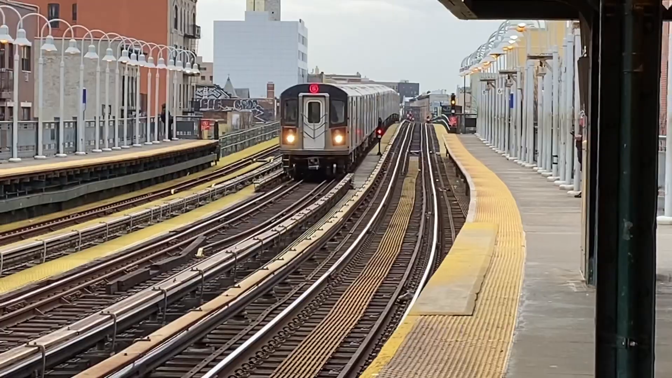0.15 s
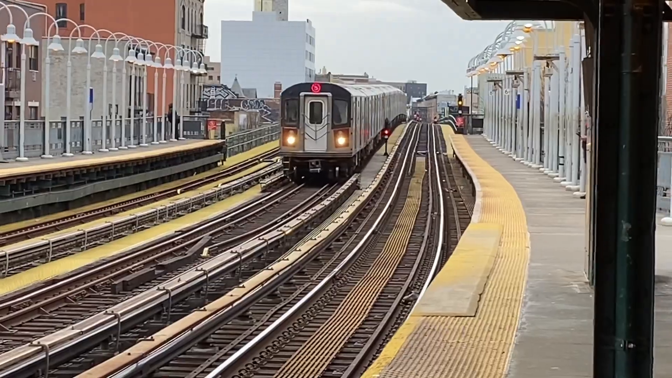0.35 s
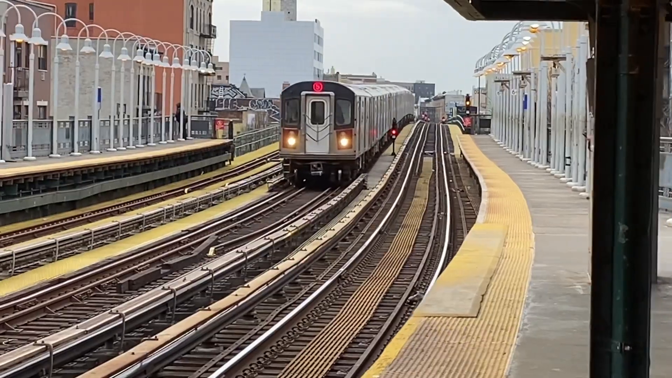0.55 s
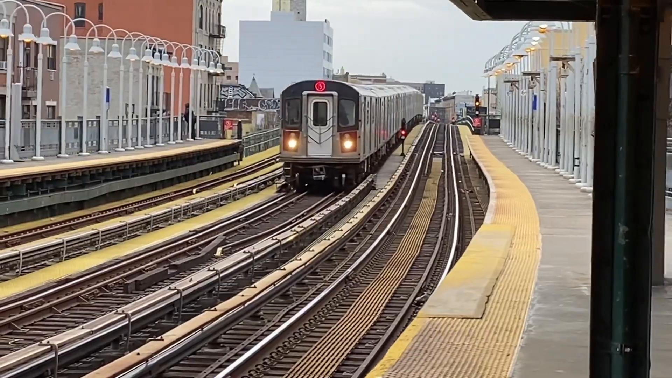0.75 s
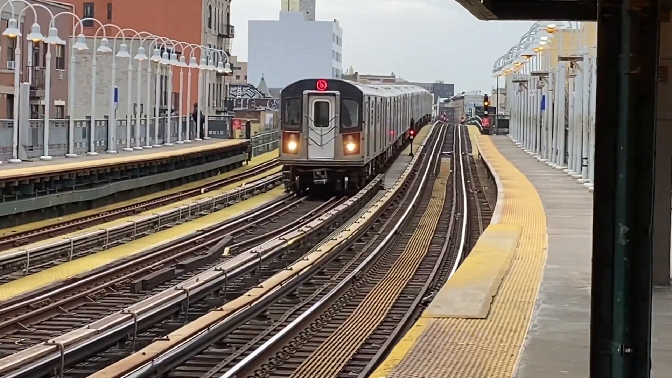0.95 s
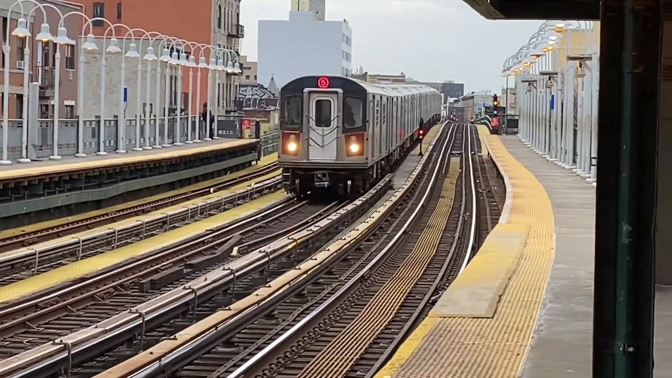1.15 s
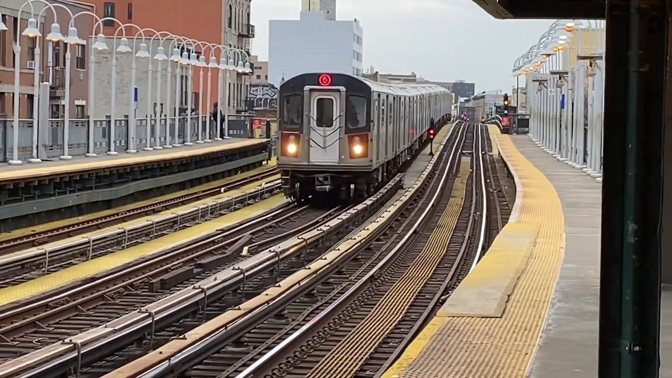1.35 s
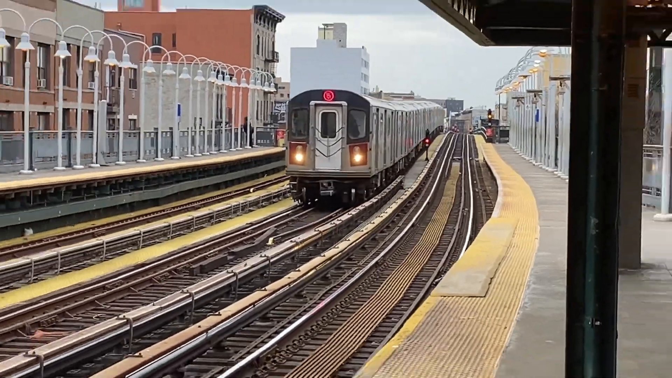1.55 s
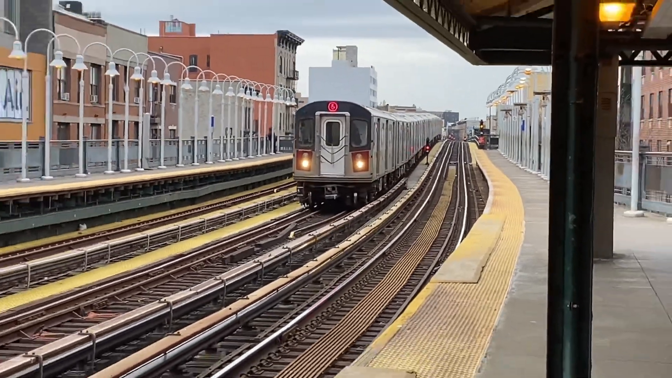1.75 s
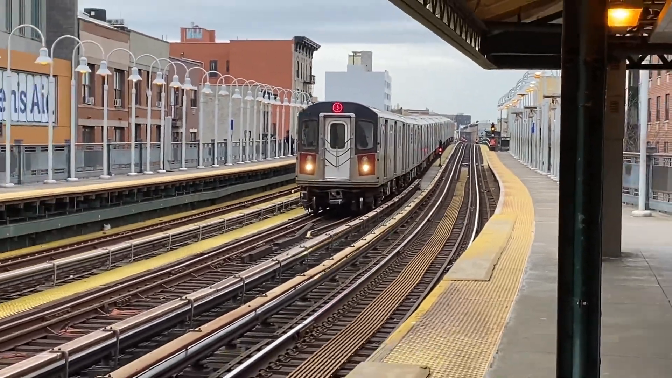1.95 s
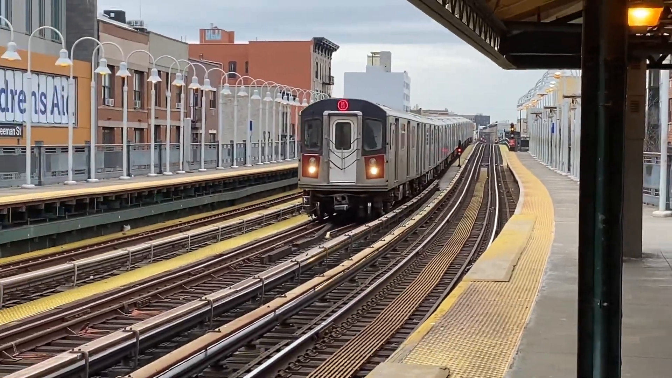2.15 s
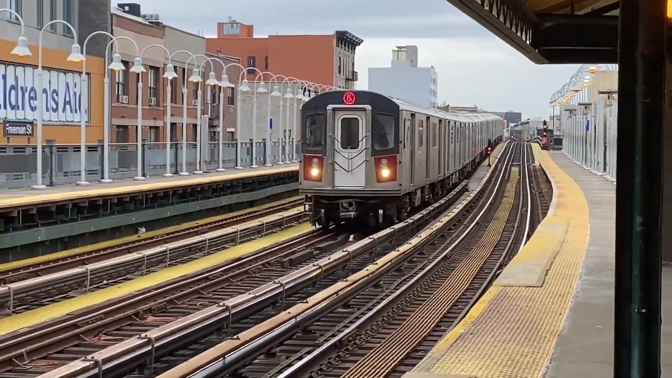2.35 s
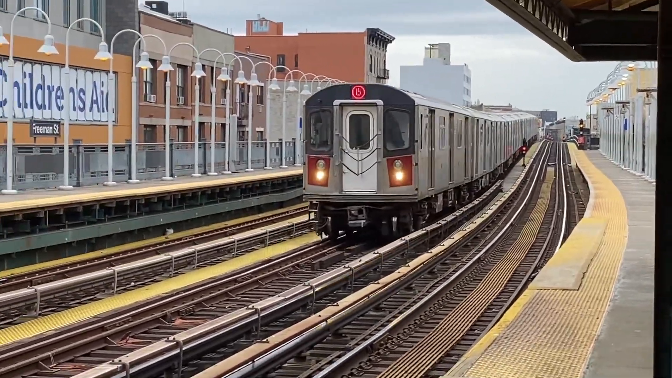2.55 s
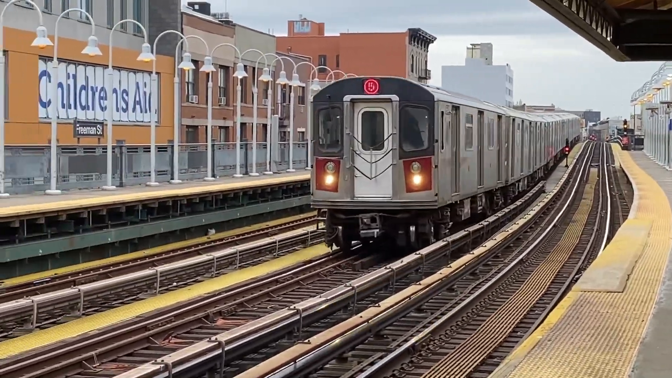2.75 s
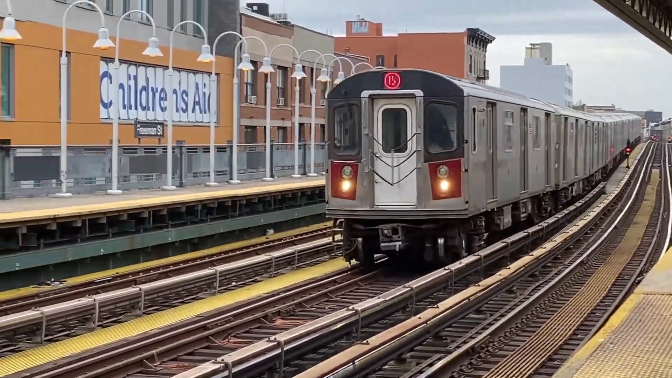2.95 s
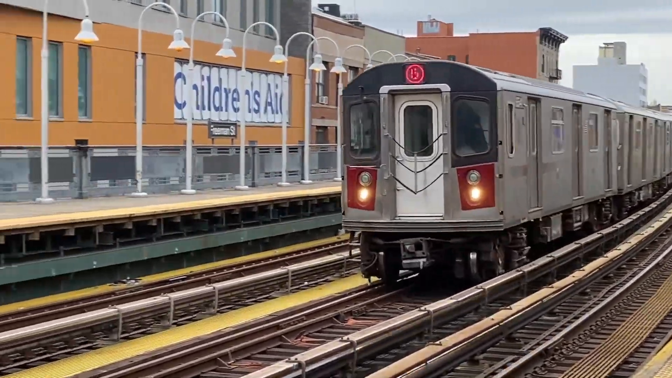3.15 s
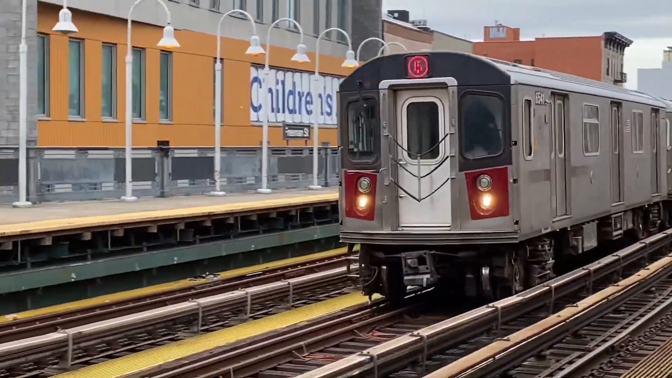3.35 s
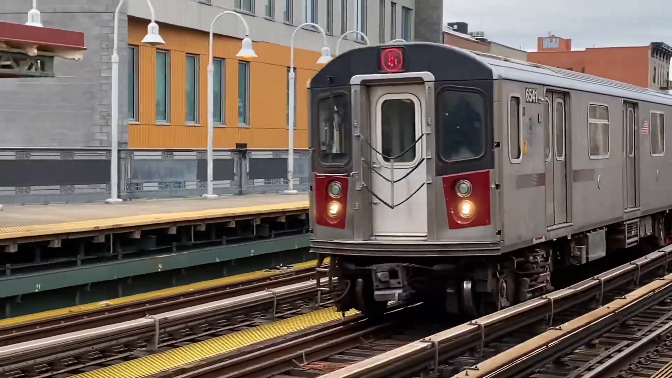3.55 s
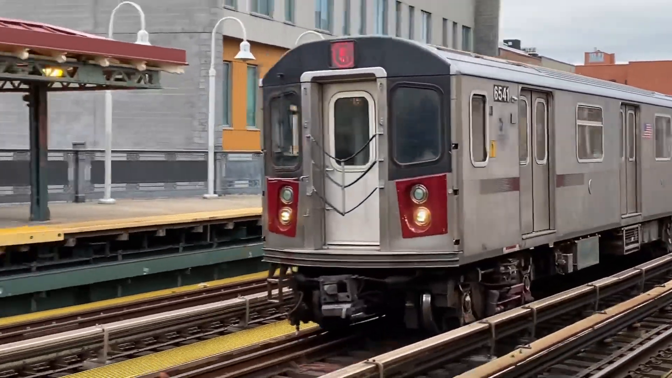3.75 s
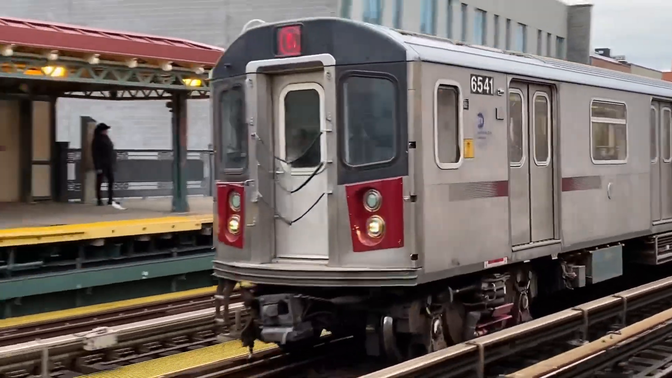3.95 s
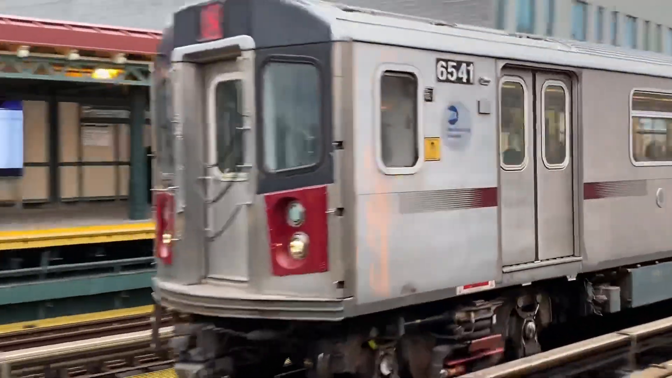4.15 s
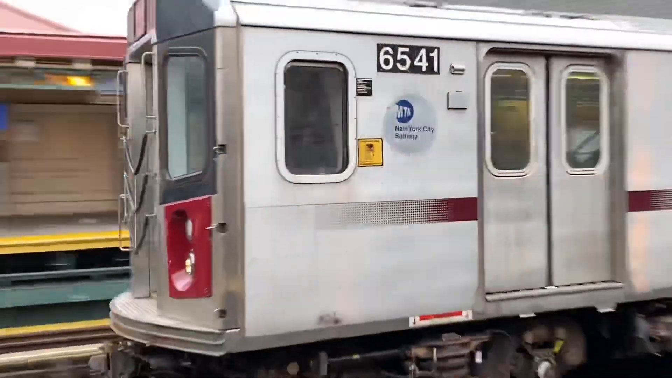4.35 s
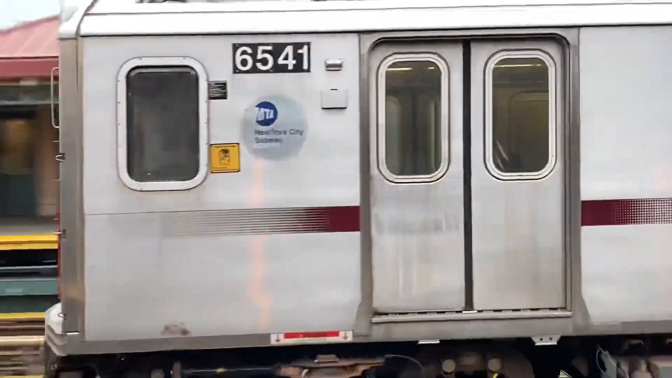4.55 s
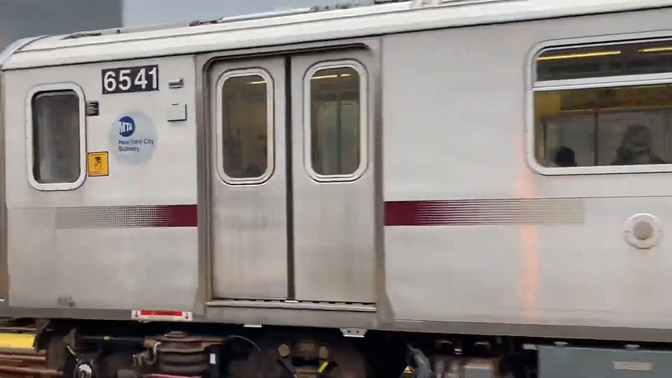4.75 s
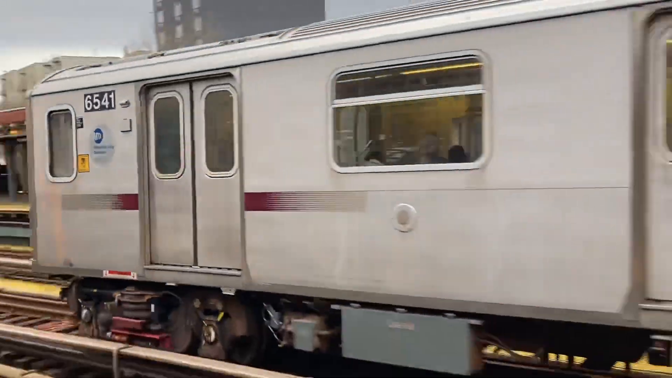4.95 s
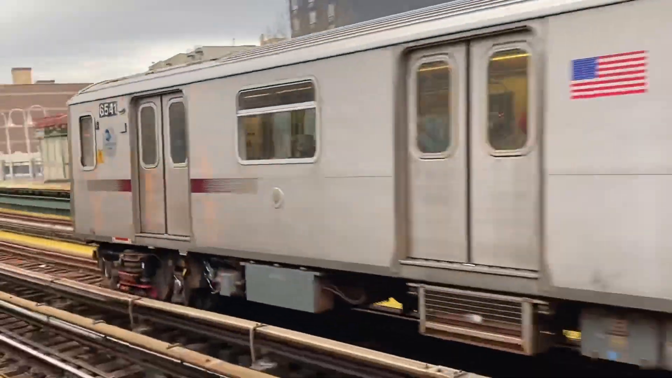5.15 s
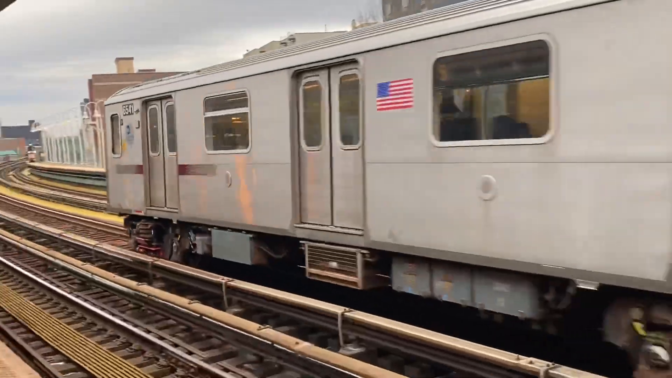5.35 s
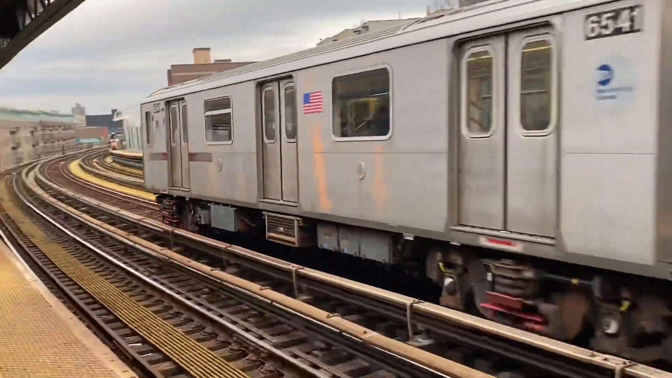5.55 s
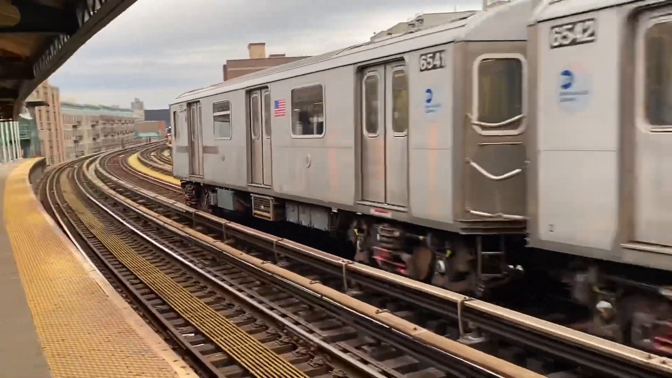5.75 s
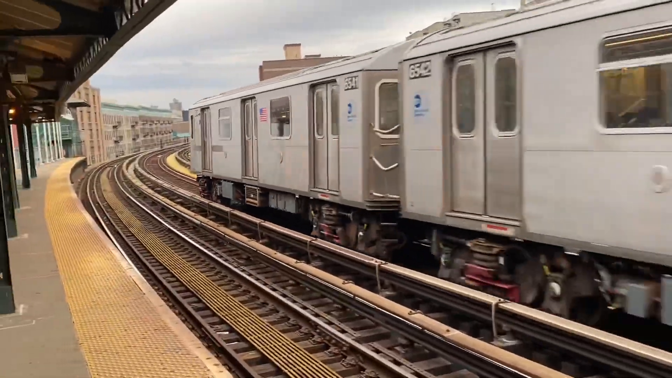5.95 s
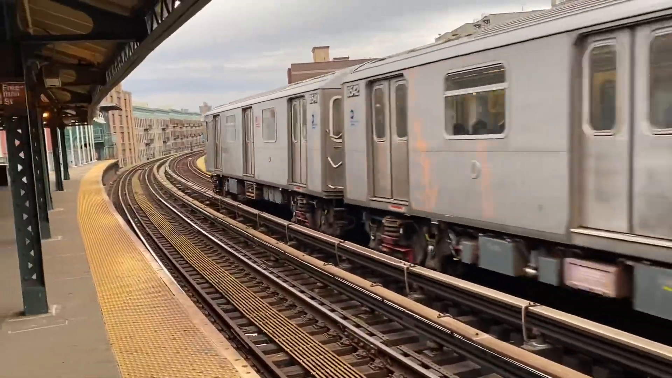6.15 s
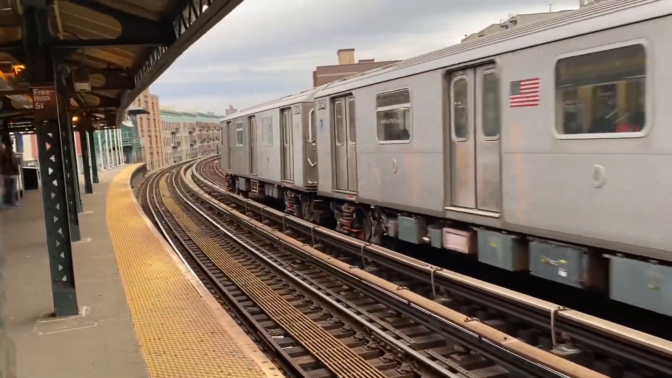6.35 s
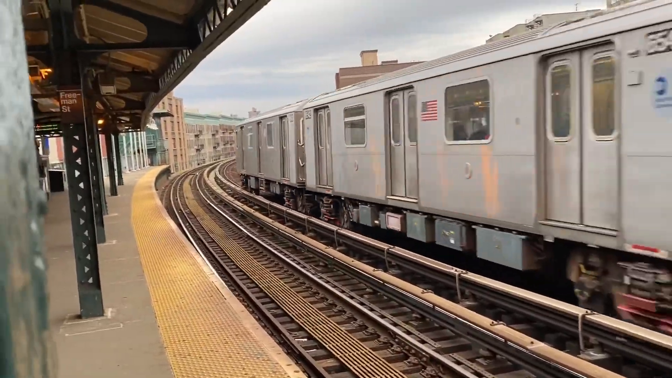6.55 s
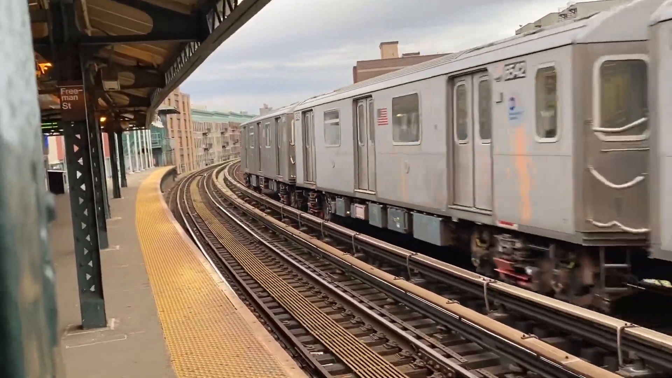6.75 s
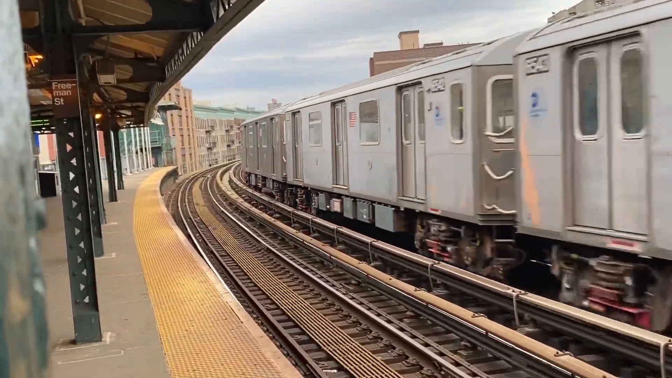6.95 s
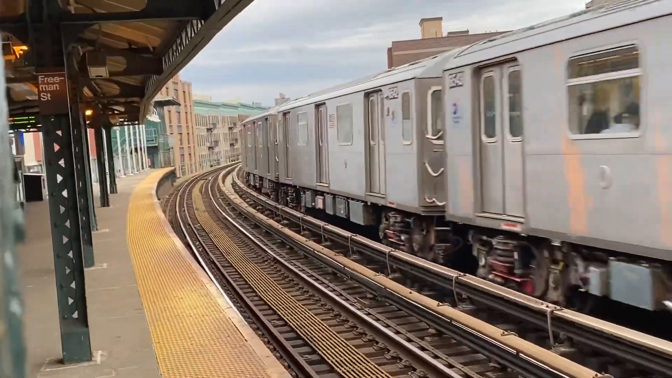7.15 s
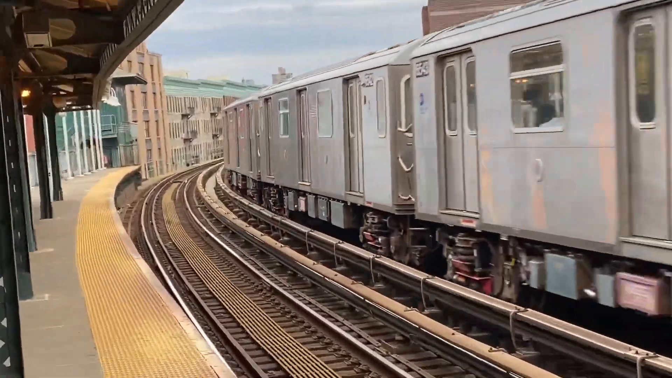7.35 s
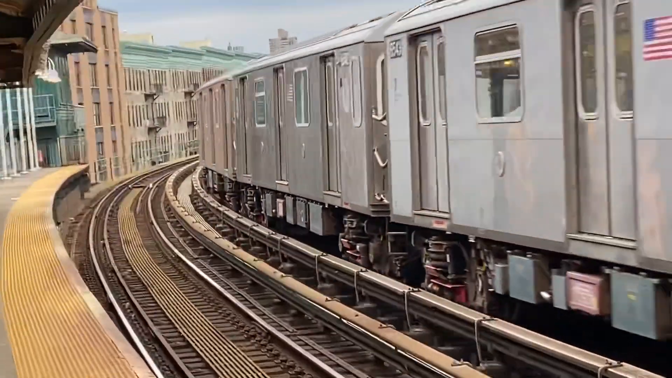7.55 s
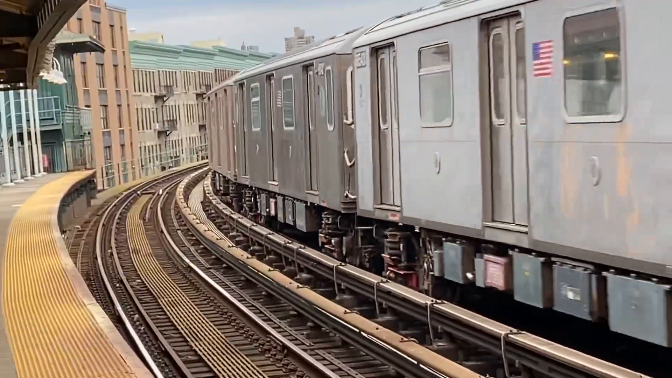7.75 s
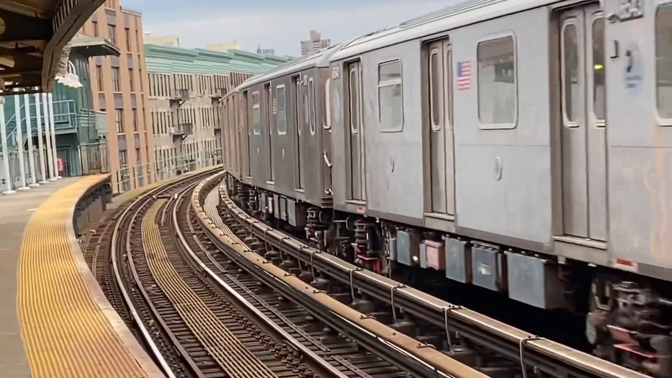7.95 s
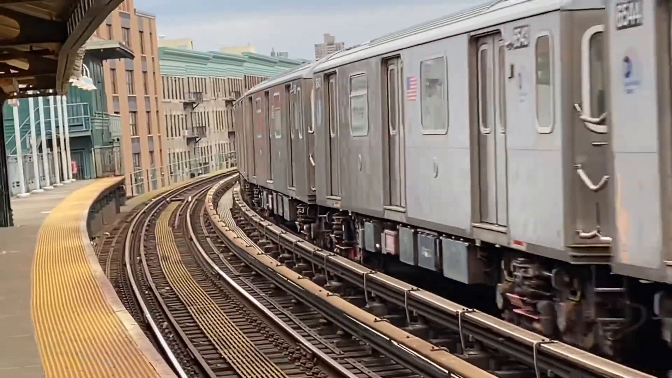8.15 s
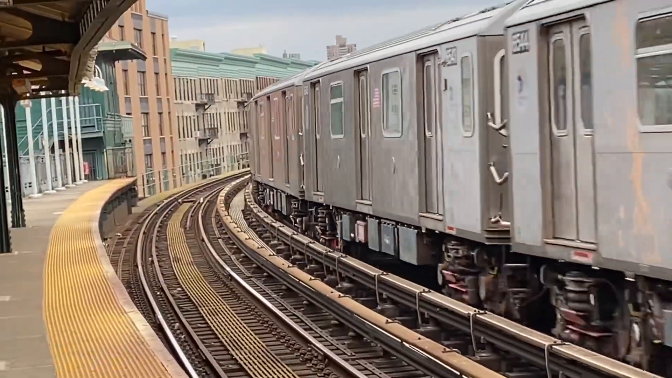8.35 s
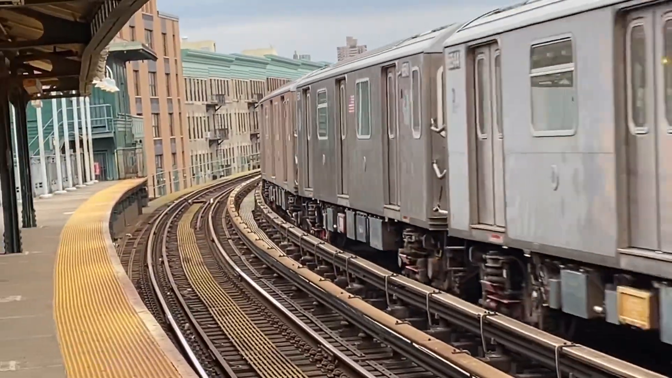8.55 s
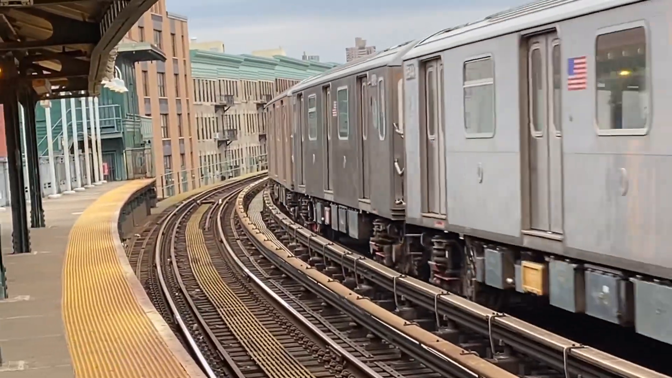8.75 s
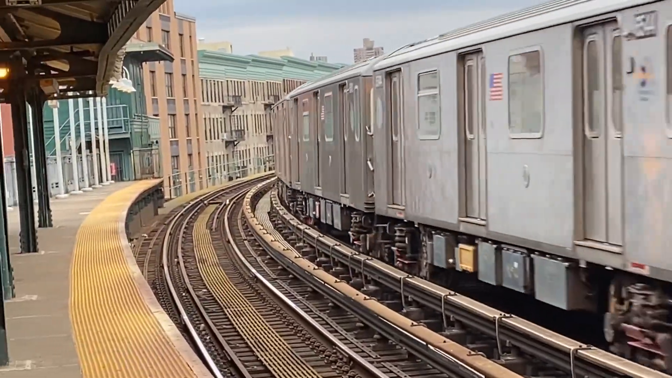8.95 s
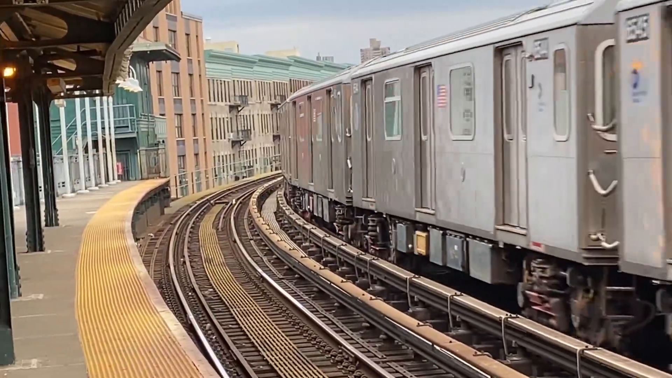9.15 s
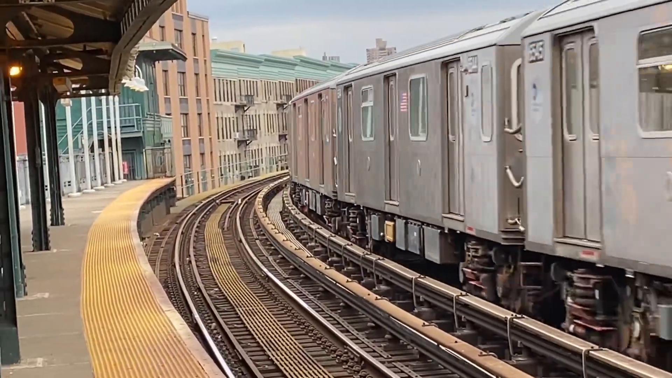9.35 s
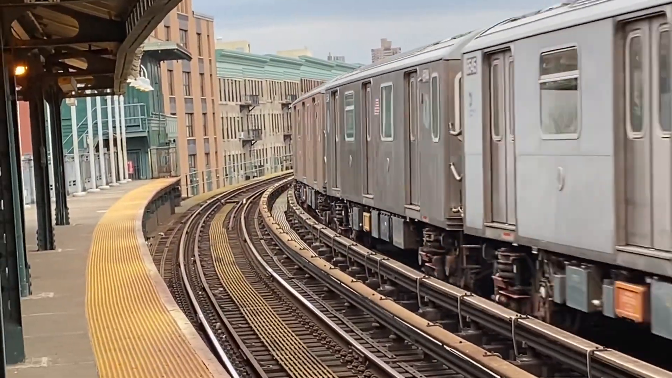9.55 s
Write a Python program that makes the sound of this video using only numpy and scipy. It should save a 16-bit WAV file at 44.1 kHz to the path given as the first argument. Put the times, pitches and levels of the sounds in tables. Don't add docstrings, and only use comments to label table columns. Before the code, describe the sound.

An electric train runs along elevated steel track beside an open-air platform. At 0-1 s it is distant: low rumble, faint 60 Hz structural hum and small cracks at rail joints. From 1 to 3 s the roar grows, with ringing double knocks, girder boom and a rail ring near 1.2 kHz around 2.7 s. At 3.1-3.5 s a hard crack, thin squeals and a sinking wheel tone mark the nearing front. Around 4-4.5 s it is loudest, with heavy slams and clatter close by; the hum disappears. From 5 to 9.6 s cars keep rolling past, slightly lower but still strong: roar and rumble, irregular paired axle cracks, dull thuds, gritty metallic pings, wheel tones near 450 Hz and swelling bright flange hiss. The close stereo microphone rounds off peaks; the passing continues to the cut.

```python
import sys
import numpy as np
from scipy import signal
from scipy.io import wavfile
from scipy.ndimage import uniform_filter1d

SR = 44100
rng = np.random.default_rng(int(sys.argv[2]) if len(sys.argv) > 2 else 0)


def master(y):
    cut = np.clip(np.atleast_2d(y).T, -1, 1)
    pcm = np.round(cut * 32767)
    wavfile.write(sys.argv[1], SR, pcm.astype(np.int16))


def makeup_ratio(level_db):
    decades = np.asarray(level_db, float) / 20
    return 10 ** decades


N = 422919
STEP = 40

# time_s, nearness (0 far to 1 alongside)
NEARNESS = [(0, 0.031), (1, 0.22), (2, 0.19), (3, 0.39), (3.6, 0.43), (4.4, 0.63), (6, 0.78), (9.59, 0.93)]
# pitch_hz, side_over_mid_db
STEREO_WIDTH = [(60, -19), (160, -16), (270, -11.5), (450, -7.5), (740, -6), (1300, -1), (2100, -9.5),
                (3500, -25.5), (8000, -12), (15000, 0)]


def in_time(rows):
    s, *columns = np.transpose(rows)
    return [np.interp(np.arange(N) / SR, s, c) for c in columns]


def at_hz(points, hz):
    known_hz, known_db = np.transpose(points)
    return np.interp(np.log(hz), np.log(known_hz), known_db)


def rms_one(x):
    return x / np.sqrt(np.mean(x ** 2) + 1e-20)


def fine(slow):
    return np.interp(np.arange(N) / STEP, np.arange(len(slow)), slow)


def wander(rate):
    r = np.exp(-2 * np.pi * rate * STEP / SR)
    settle = 2000
    luck = rng.standard_normal(len(range(0, N, STEP)) + settle)
    return rms_one(signal.lfilter([1], [1, -2 * r, r * r], luck)[settle:])


def drift(rate):
    return fine(wander(rate))


def swell(start_s, length_s):
    progress = (np.arange(0, N, STEP) / SR - start_s) / length_s
    return np.sin(np.pi * np.clip(progress, 0, 1)) ** 2


def resonance(x, hz, width_hz):
    r = np.exp(-np.pi * width_hz / SR)
    poles = [1, -2 * r * np.cos(2 * np.pi * hz / SR), r * r]
    return signal.lfilter(np.array([1, 0, -1]) * (1 - r * r) / 2, poles, x)


def singing(gain, hz, width_hz):
    ring = rms_one(resonance(rng.standard_normal((2, N)), hz, width_hz))
    return gain * ring * makeup_ratio([[0], [at_hz(STEREO_WIDTH, hz)]])


def level(law, events=(), reach=1):
    # time_s, level_db
    overall_loudness = [(0.0, -27.5), (1.04, -25), (1.28, -22), (3.28, -15.5), (3.44, -18), (3.5, -17),
                        (3.92, -16), (4.0, -14.5), (4.22, -15.5), (4.38, -12.5), (4.56, -19), (4.97, -16.5),
                        (5.42, -19.5), (6.03, -16.5), (6.52, -20), (6.73, -17.5), (9.54, -16.5), (9.59, -17)]
    typical_db = -19
    far_db, close_db, share = law
    near = np.clip(in_time(NEARNESS)[0] / reach, 0, 1)
    swing_db = share * (in_time(overall_loudness)[0] - typical_db)
    steady = makeup_ratio(far_db + (close_db - far_db) * near + swing_db)[::STEP]
    extra = sum((makeup_ratio(db) * swell(s, length)) ** 2 for s, length, db in events)
    return fine(np.sqrt(steady ** 2 + extra))


def noise(far, close, patchy_db, shared_db, rate):
    low_hz, high_hz = far[0][0], far[-2][0]
    edges = low_hz * 2 ** np.arange(0, np.log2(high_hz / low_hz) + 1 / 3, 1 / 3)
    near = np.clip(in_time(NEARNESS)[0][::STEP], 0, 1)
    white = rng.standard_normal((2, 2, N))
    together = shared_db * wander(rate)
    out, power = 0, 0
    for k, (low, high) in enumerate(zip(edges, edges[1:])):
        band_filter = signal.butter(2, [low, min(high, .45 * SR)], "band", fs=SR, output="sos")
        band = signal.sosfilt(band_filter, white[k % 2])
        hz = np.sqrt(low * high)
        colour = makeup_ratio(at_hz(far, hz) * (1 - near) + at_hz(close, hz) * near)
        power = power + colour ** 2 * (high - low) * 2 / SR
        flicker = fine(colour * makeup_ratio(together + patchy_db * wander(rate)))
        out = out + band * flicker * makeup_ratio([[0], [at_hz(STEREO_WIDTH, hz)]])
    return out / fine(np.sqrt(power))


def crossings():
    # start_s, second_axle_later_s, first_peak_db, second_peak_db, rail_ring_over_peak_db
    bogies = [(0.1231, 0.15, -42, -25.5, 3), (0.6549, 0.13, -22.5, -23, 2), (1.0216, 0.16, -21.5, -22, 3.5),
              (1.4044, 0.13, -21, -23.5, 3), (1.934, 0.14, -17.5, -20.5, -3),
              (2.4144, .1342, -14.5, -16.5, -3), (3.1428, 0.14, -6.5, -10, -10.5),
              (3.5049, 0.14, -16, -25, -6), (4.2288, .1306, -13, -14.5, -1),
              (4.6794, 0.12, -17.5, -14, 2.5), (4.9172, 0.16, -11, -17.5, -2),
              (5.3544, .1300, -16, -13, -4), (5.6459, .1279, -23, -12, -4), (6.3208, .1329, -14.5, -13, -8),
              (6.5947, 0.15, -18, -11.5, -15), (7.2796, 0.15, -15, -17, -5), (7.561, 0.13, -16, -14, -2),
              (8.2295, 0.13, -15, -14.5, -20), (8.5099, 0.12, -15.5, -13, -14),
              (9.1704, 0.13, -13, -14, -5)]
    # start_s, peak_db, rail_ring_over_peak_db, rail_ring_hz
    single_axles = [(0.0344, -29, -5, 756), (0.4683, -40, 13, 965), (1.1934, -34, 21.5, 756),
                    (1.7644, -28, -15, 1260), (2.2006, -18, -2, 1140), (2.8988, -35, 15, 1160),
                    (3.22, -34, -8.5, 807), (3.384, -12.5, -6, 1180), (3.9429, -6.5, -7, 763),
                    (3.9886, -11, -6, 1100), (4.633, -12.5, -1, 757), (5.2063, -16, 1, 760),
                    (5.5494, -22, -11, 874), (6.1744, -17, -19, 754), (6.5194, -17.5, -18, 1050),
                    (7.0394, -21.5, -14, 818), (7.1324, -18, -14, 760), (7.8014, -22.5, -6, 785),
                    (7.9864, -42, -11, 810), (8.081, -20, -26, 764), (8.4144, -33, -12.5, 910),
                    (8.8735, -13.5, -14, 912), (9.0319, -17, -13, 770), (9.4509, -12, -9, 880),
                    (9.5794, -10.5, -4, 790), (8.205, -31, -14, 800), (8.7443, -28, -12, 800),
                    (1.3843, -26, -8, 1090), (4.035, -14, -6, 785), (6.6194, -18, -12, 800),
                    (7.2557, -20, -12, 800), (5.33, -22, -10, 820)]
    rows = list(single_axles)
    tuning = 1 + 0.045 * rng.normal(0, 1, (len(bogies), 2))
    for (s, later, first_db, second_db, rail_db), (one, two) in zip(bogies, tuning):
        hz = 1103 if s < 3.0 else 788
        rows += [(s, first_db, rail_db, hz * one), (s + later, second_db, rail_db, hz * two)]
    return rows


def jolts(rows):
    shake_t60_s = 0.21
    blows = np.zeros(N)
    for s, peak_db, *_ in rows:
        blows[round(s * SR)] = makeup_ratio(peak_db)
    return signal.lfilter([1], [1, -makeup_ratio(-60 / (shake_t60_s * SR))], blows)


def rail_roar(shaking):
    # pitch_hz, level_db (per Hz)
    roar_colours = [
        [(380, -13), (650, 2.5), (866, -3), (1080, 1.5), (1420, -10), (2000, -8), (3470, -15), (5140, -27.5), (6920, -33), (8200, -53), (10700, -75), (18000, -120)],
        [(380, -18), (650, -1), (1500, -9), (2400, -5), (3440, -9.5), (3740, -12), (4200, -12), (6630, -17), (7610, -12.5), (8200, -50), (10700, -78), (18000, -120)],
    ]
    # start_s, length_s, level_db
    clatter = [
        (2.583, 0.21, -26.5),
        (3.247, 0.22, -19),
        (3.618, 0.16, -25),
        (3.875, 0.26, -21),
        (4.026, 0.26, -23),
        (4.618, 0.33, -24),
        (5.597, 0.15, -22.5),
        (6.543, 0.26, -29),
        (8.476, 0.21, -40),
    ]
    # start_s, length_s, level_db
    rail_songs = [
        (1.0, 2.5, -65),
        (2.5, 0.47, -31.5),
    ]
    gain = np.hypot(level((-26, -26.5, 0.79), clatter), makeup_ratio(-23.5) * shaking)
    roar = gain * noise(*roar_colours, 1.04, 0.88, 15.0)
    return roar + singing(level((-43.5, -49.5, 1), rail_songs), hz=1210, width_hz=100)


def wheel_rumble():
    # pitch_hz, level_db (per Hz)
    rumble_colours = [
        [(59, -13), (100, -3.5), (227, 0), (327, 0.5), (536, -9), (633, -14), (800, -11.5), (1040, -40), (1760, -120)],
        [(59, -11), (100, -4.5), (243, -3.5), (389, -3.5), (447, -4), (580, -10.5), (800, -16.5), (1040, -25), (1760, -120)],
    ]
    return level((-18.5, -22, 0.98)) * noise(*rumble_colours, 0.17, 0.8, 5.4)


def wheel_song():
    # start_s, length_s, level_db
    wheel_songs = [(0.256, 0.23, -42), (2.198, 0.2, -26.5), (2.727, 0.41, -21), (3.295, 0.26, -16),
                   (3.547, 0.26, -18), (3.994, 0.22, -16), (4.153, 0.26, -23), (4.75, .22, -30),
                   (5.032, 0.12, -25), (5.45, 0.17, -22), (5.993, 0.16, -19.5), (6.36, 0.22, -25),
                   (6.7, 0.85, -23), (7.84, 0.29, -19.5), (8.146, 0.16, -17), (8.56, 0.22, -21),
                   (8.75, 0.35, -19), (9.042, 0.25, -18.5)]
    steadiness = 0.65
    ring = singing(0.74, hz=452.6, width_hz=27.4)
    size = np.sqrt(uniform_filter1d(ring[0] ** 2, size=400) + 1e-3)
    return level((-30.5, -34, 1), wheel_songs) * ring / size ** steadiness


def front_songs():
    # start_s, length_s, level_db, from_hz, to_hz
    glides = [
        (3.311, 0.226, -14, 481.3, 432),
        (4.202, .16, -23, 440, 472),
    ]
    t = np.arange(N) / SR
    out = np.zeros(N)
    for s, length, db, from_hz, to_hz in glides:
        hz = np.interp(t, [s, s + length], [from_hz, to_hz])
        out += makeup_ratio(db) * fine(swell(s, length)) * np.sin(2 * np.pi * np.cumsum(hz) / SR)
    return out * np.sqrt(2) * [[1], [.3]]


def ragged():
    chips_per_s, chip_t60_s, chip_share = 900, .012, .2
    chips = (rng.random(N) < chips_per_s / SR) * rng.exponential(1, N)
    jumps = rms_one(signal.lfilter([1], [1, -makeup_ratio(-60 / (chip_t60_s * SR))], chips))
    return rms_one(1 - chip_share + chip_share * jumps)


def knocks(rows):
    # pitch_hz, level_db (per Hz)
    crack_colours = [
        [(600, -2), (1200, 9.5), (2200, 4), (4300, -6.5), (6000, -12), (9000, -19), (16000, -57), (17500, -45)],
        [(600, 10.5), (1200, -4.5), (2200, -0.5), (4300, 1), (6000, -2), (9000, -12), (16000, -21), (17500, -24)],
    ]
    # pitch_hz, level_db, t60_s
    steel_modes = [
        (2130, -18, .07),
        (2590, -20, 0.099),
        (3350, -16, 0.07),
        (4350, -21, 0.038),
    ]
    crack, rings = np.zeros(N), np.zeros(N)
    t = np.arange(SR // 2) / SR
    luck = rng.normal(0, 1, (len(rows), len(steel_modes), 2))
    for (s, peak_db, rail_db, rail_hz), draws in zip(rows, luck):
        at = round(s * SR)
        part = t[:N - at]
        rise = 1 - np.exp(-part / 0.00068)
        blow = makeup_ratio(-12.0 - 60 * part / 0.18)
        rattle = makeup_ratio(-24.5 - 60 * part / 1.35)
        crack[at:at + len(part)] += makeup_ratio(peak_db) * rise * (blow + rattle)
        turn = 2 * np.pi * rail_hz * part
        beating = np.sin(turn) + 0.69 * np.sin(1.13 * turn) + 0.75 * np.sin(0.85 * turn)
        ringing = makeup_ratio(rail_db - 2.5 - 60 * part / 0.092) * beating
        for (hz, level_db, ring_s), (strength, detune) in zip(steel_modes, draws):
            tone = np.sin(2 * np.pi * hz * (1 + 0.0262 * detune) * part)
            ringing += makeup_ratio(level_db + 2.5 * np.clip(strength, -2, 1) - 60 * part / ring_s) * tone
        rings[at:at + len(part)] += makeup_ratio(peak_db) * rise * ringing
    web = singing(level((-11, -13, 0), reach=0.71), hz=4300, width_hz=405)
    return crack * ragged() * (noise(*crack_colours, 2.0, 0.61, 24) + web) + rings * [[1], [.3]]


def thuds():
    # start_s, peak_db, pitch_hz
    sleeper_thuds = [(0.92, -9.5, 311), (1.255, -4, 328), (2.053, -8, 293), (2.795, -8, 254),
                     (3.148, -2, 277), (3.322, -3, 418), (3.646, -4, 454), (3.945, -20, 366),
                     (4.027, -0.5, 380), (4.078, -6, 360), (4.279, -10, 452), (4.36, -10, 371),
                     (4.469, -11, 336), (4.799, -7, 474), (5.14, -13, 244), (5.312, -10, 253),
                     (5.521, -9, 385), (5.642, -5, 293), (5.756, -7, 447), (5.857, -8, 355),
                     (5.923, -6, 236), (6.055, -8, 428), (6.305, -19, 270), (6.632, -7, 344),
                     (7.016, -8, 286), (7.134, -7, 256), (7.487, -9, 261), (7.636, -6, 288),
                     (7.87, -4.5, 353), (7.955, -8, 423), (8.072, -7, 454), (8.19, -3, 321),
                     (8.295, -5, 440), (8.652, -1, 320), (8.769, -9, 234), (9.355, -6, 339),
                     (4, -3, 240),
        (5.6, -6, 600),
        (3.98, -2, 230),
        (4.042, -2, 720),
        (4.4, 1, 400),
        (3.585, -9, 315),
        (5.4, -3, 160),
        (2.21, -7, 145),
    ]
    out, t = np.zeros(N + SR), np.arange(SR // 4) / SR
    shape = (1 - np.exp(-t / 0.0028)) * makeup_ratio(-6.5 - 60 * t / 0.13)
    for s, peak_db, hz in sleeper_thuds:
        at = round(s * SR)
        ring = np.sin(2 * np.pi * hz * t) + .3 * np.sin(2 * np.pi * .8 * hz * t)
        out[at:at + len(t)] += makeup_ratio(peak_db) * shape * ring
    return out[:N] * [[1], [.3]]


def pings():
    # start_s, peak_db, pitch_hz
    near_pings = [(3.1428, -9, 3160), (3.2784, -11.5, 3350), (3.5049, -12.5, 2900), (3.6366, -15.5, 4360),
                  (3.9429, -14, 3210), (4.2288, -12.5, 3410), (4.3594, -16, 3380), (4.8035, -17, 3000),
                  (4.9172, -15, 2570), (5.2061, -16, 6500), (5.3534, -21, 2590), (5.4849, -18, 2510),
                  (5.5594, -17, 4890), (5.6476, -17, 2530), (5.7733, -13.5, 3970), (6.3205, -15, 3900),
                  (6.4534, -12, 2780), (6.5949, -19, 3500), (6.7346, -11, 2420), (7.2794, -14.5, 2600),
                  (7.4061, -11, 3990), (7.5617, -18, 2400), (7.6884, -13.5, 3320), (8.082, -18, 4130),
                  (8.2297, -18, 2520), (8.3534, -12.5, 2550), (8.5106, -14, 2600), (8.6358, -12, 2430),
                  (9.1716, -17, 4250), (9.2953, -20, 3970), (9.4514, -15.5, 3710)]
    # start_s, peak_db, pitch_hz
    far_pings = [(0.269, -29, 4300), (1.026, -24.5, 4260), (1.163, -26, 4200), (1.2, -30, 4300),
                 (1.409, -22, 4250), (1.537, -22, 4300), (1.764, -18.5, 3260), (1.775, -25.5, 4300),
                 (1.934, -23.5, 4330), (2.414, -22.5, 3400), (2.549, -18.5, 4320)]
    out, t = np.zeros(N + SR), np.arange(SR // 5) / SR
    rows = [(*row, -12) for row in far_pings]
    rows += [(*row, 0) for row in near_pings]
    grit = rng.standard_normal((len(rows), 2, len(t)))
    high = signal.butter(2, [2500, 12000], "band", fs=SR, output="sos")
    for (s, peak_db, hz, air_db), (rough, sharp) in zip(rows, grit):
        ring = makeup_ratio(-12.5 - 60 * t / 0.21) * rms_one(resonance(rough, hz, width_hz=320))
        tick = makeup_ratio(-11.5 + air_db - 60 * t / .06) * signal.sosfilt(high, sharp)
        out[round(s * SR):][:len(t)] += makeup_ratio(peak_db) * (ring + tick)
    return out[:N] * [[1], [.3]]


def flange_hiss(shaking):
    # pitch_hz, level_db (per Hz)
    hiss_colour = [(4500, 4), (6500, 0), (8000, 0.5), (10500, -0.5), (14000, -4.5), (16000, -2),
                   (17500, -4)]
    # start_s, length_s, level_db
    rubs = [(0.607, 0.49, -52), (1.36, 0.11, -61.5), (1.903, .14, -57), (3.89, 0.18, -35),
            (4.206, 0.066, -31.5), (5.187, 0.08, -41), (5.326, .25, -44), (5.924, 0.42, -41),
            (6.2, 0.31, -35.5), (6.595, 0.22, -37), (6.94, 0.4, -39.5), (7.697, 0.19, -42),
            (8.061, 0.072, -38), (8.49, 0.24, -37), (8.667, 0.19, -34), (8.893, 0.21, -38),
            (9.134, .16, -36), (9.372, 0.34, -35.5)]
    rubbing = np.hypot(level((-74.5, -43.5, 0.67), rubs, reach=0.48), makeup_ratio(-57) * shaking)
    return makeup_ratio(4.5) * rubbing * noise(hiss_colour, hiss_colour, 2.06, 1.0, 25.0)


def squeals():
    # start_s, length_s, pitch_hz, width_hz, level_db
    flange_squeals = [(.45, .35, 6800, 70, -60), (.7, .3, 6300, 1500, -49), (.86, .12, 6550, 150, -52),
                      (1.3, 1.6, 5700, 350, -51), (1.41, .12, 11900, 70, -66), (3.09, .07, 3280, 25, -35),
                      (3.14, .05, 3250, 60, -34), (3.19, .1, 3260, 20, -32), (3.27, .05, 3350, 60, -32),
                      (5.19, .07, 6600, 200, -38), (6.25, .2, 14900, 150, -41), (6.3, .17, 10800, 100, -46),
                      (8.74, .09, 11900, 150, -48), (9.01, .06, 6500, 70, -37),
                      (9.45, .12, 11500, 150, -50)]
    out, rub = np.zeros(N), rng.standard_normal(N)
    for s, length, hz, width_hz, level_db in flange_squeals:
        out += makeup_ratio(level_db + 3) * fine(swell(s, length)) * rms_one(resonance(rub, hz, width_hz))
    return out * [[1], [0]]


def girder_boom():
    # pitch_hz, level_db (per Hz)
    boom_colours = [
        [(15, -50), (25, -22), (41, -7.5), (54, -0.5), (108, -5.5), (130, -2), (170, -19), (290, -120)],
        [(15, -38), (25, -38), (43, 1), (54, 4), (70, -1.5), (130, -2), (170, -33), (290, -120)],
    ]
    # start_s, length_s, level_db
    thumps = [(-.1, 0.31, -34), (0.887, 0.16, -27), (2.361, 0.24, -21), (2.786, 0.23, -19),
              (3.1, 0.46, -17), (3.9, 0.13, -26), (4.203, 0.12, -29), (5.3, 0.67, -27), (6.0, 0.89, -25.5),
              (7.202, 0.36, -23.5), (9.203, 0.32, -22)]
    return level((-24.5, -29.5, 0.14), thumps) * noise(*boom_colours, 0.96, 0.46, 8.4)


def beams():
    # pitch_hz, width_hz, alongside_level_db
    beam_modes = [
        (242.3, 20, -31.5),
        (326.6, 36, -31.5),
    ]
    out = 0
    for hz, width_hz, close_db in beam_modes:
        gain = level((-35, close_db, .9)) * makeup_ratio(3.5 * drift(5.4))
        out = out + singing(gain, hz, width_hz)
    return out


def hum():
    ends_s, fade_db_per_s = 3.9, 70
    turns = np.cumsum(61.6 * (1 + 0.012 * drift(0.54))) / SR
    fade_db = fade_db_per_s * np.maximum(np.arange(N) / SR - ends_s, 0)
    level_db = -27 - drift(4.8) - fade_db
    return makeup_ratio(level_db) * np.sqrt(2) * np.sin(2 * np.pi * turns) * [[1], [.1]]


def scene():
    axles = crossings()
    shaking = jolts(axles)
    rails = rail_roar(shaking)
    wheels = wheel_rumble() + wheel_song() + front_songs()
    girders = girder_boom() + beams() + hum() + thuds()
    top = signal.butter(2, 8520, fs=SR, output="sos")
    rolling = signal.sosfilt(np.vstack([top, top]), girders + wheels + rails)
    flanges = flange_hiss(shaking) + squeals()
    mid, side = rolling + flanges + knocks(axles) + pings()
    lean = signal.lfilter([.006], [1, -.9], mid)
    return np.array([mid + side + lean, mid - side - lean])


def band_limit(x):
    return signal.sosfilt(signal.butter(12, 17000, fs=SR, output="sos"), x)


def record(dry):
    ceiling = 1.05
    cut = signal.sosfilt(signal.butter(2, 36, "high", fs=SR, output="sos"), dry)
    mix = cut / (1 + (cut / ceiling) ** 4) ** 0.29
    return band_limit(mix)


dry = scene()
out = record(dry)
master(out)
```